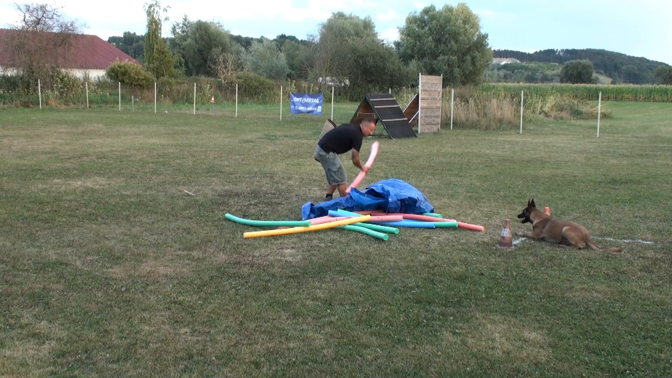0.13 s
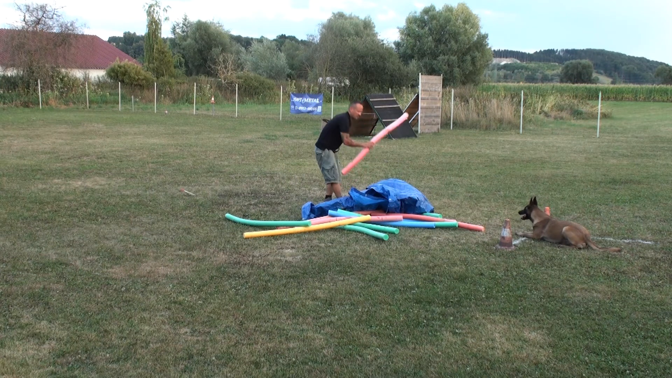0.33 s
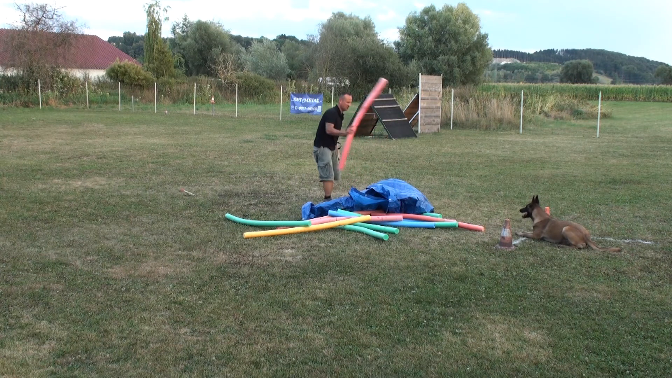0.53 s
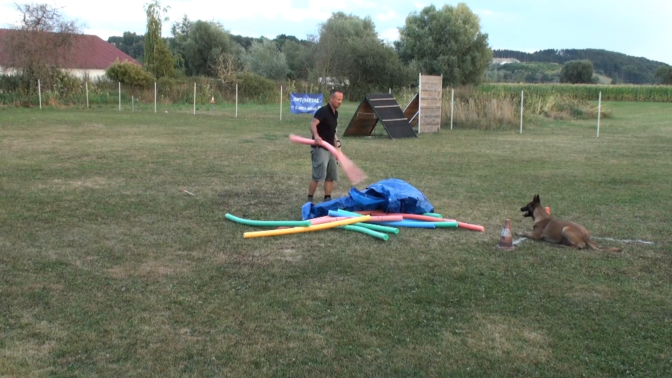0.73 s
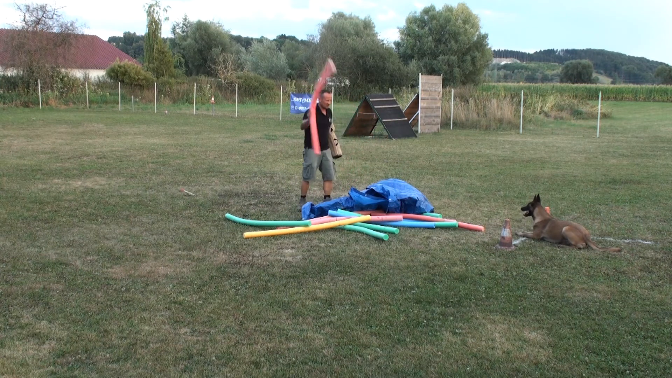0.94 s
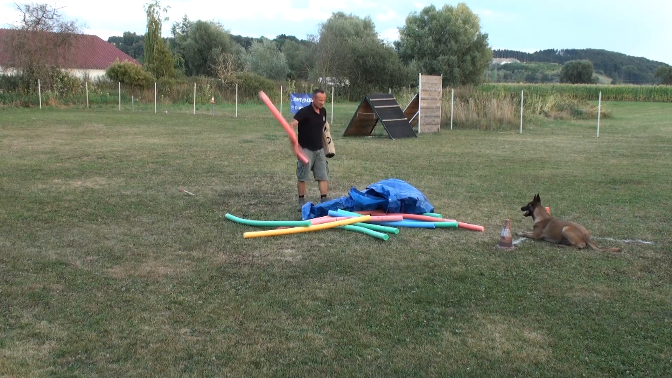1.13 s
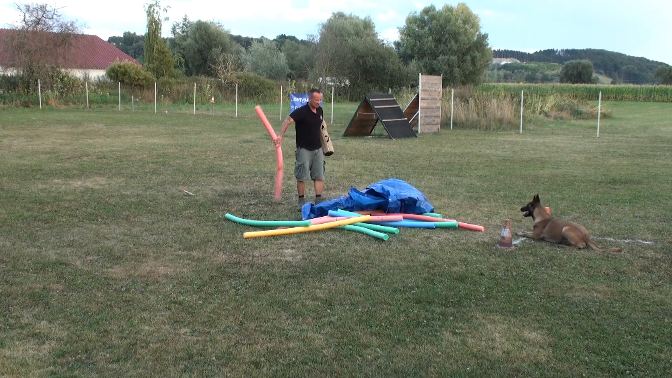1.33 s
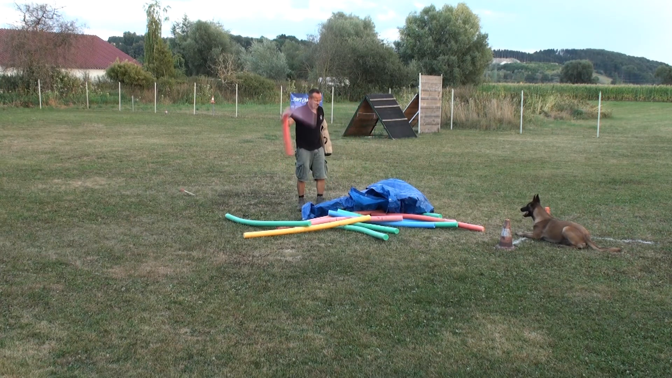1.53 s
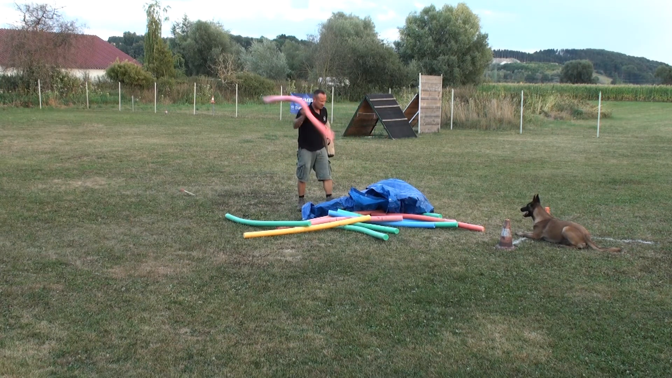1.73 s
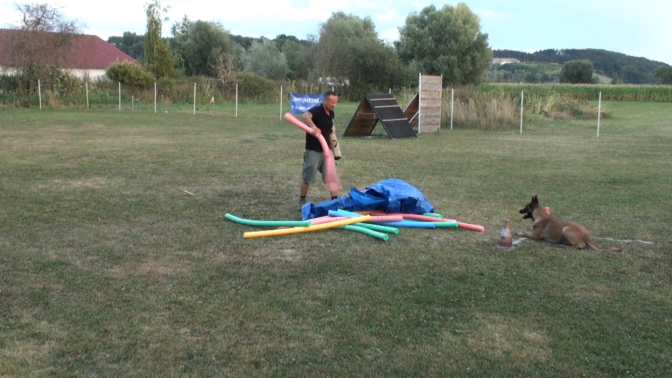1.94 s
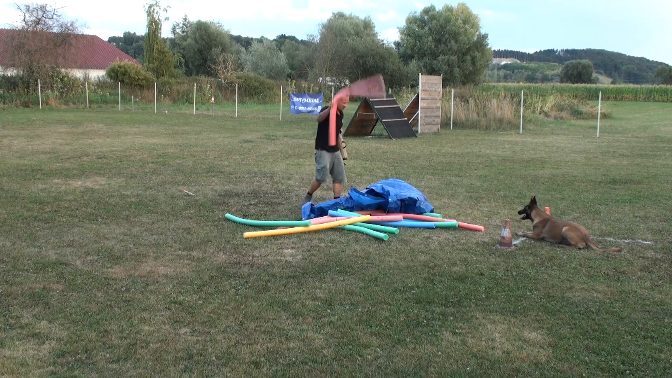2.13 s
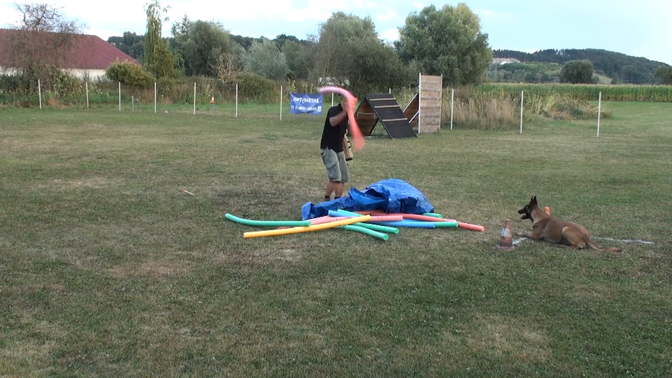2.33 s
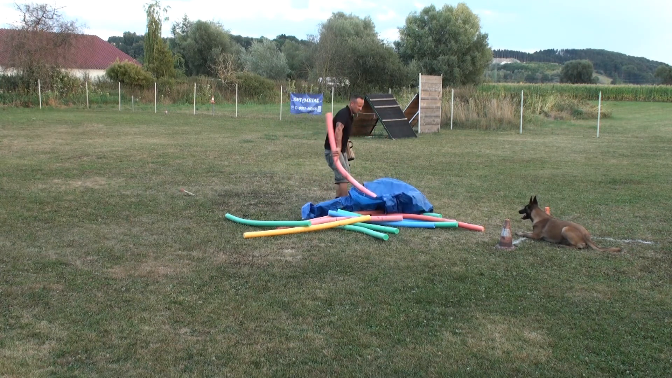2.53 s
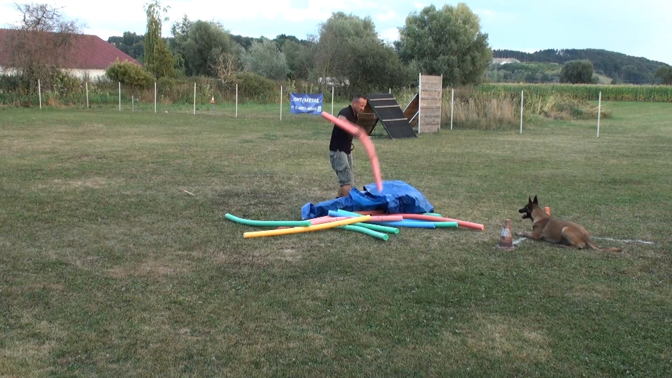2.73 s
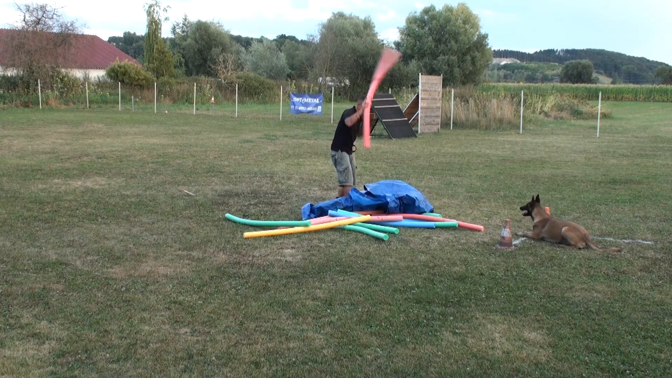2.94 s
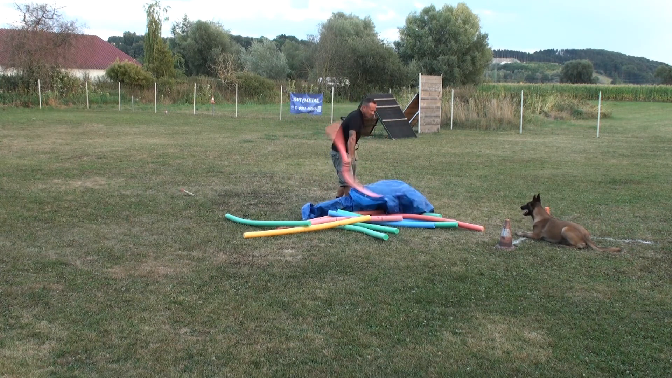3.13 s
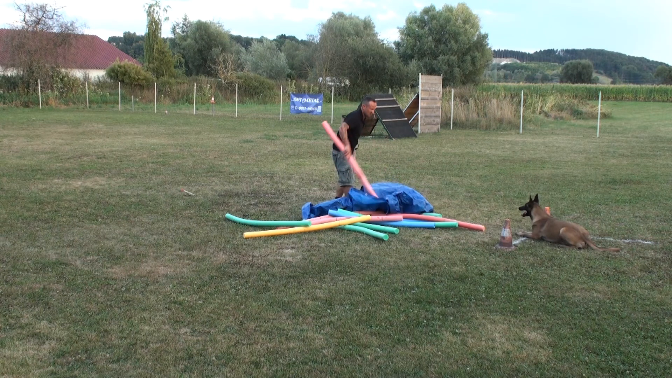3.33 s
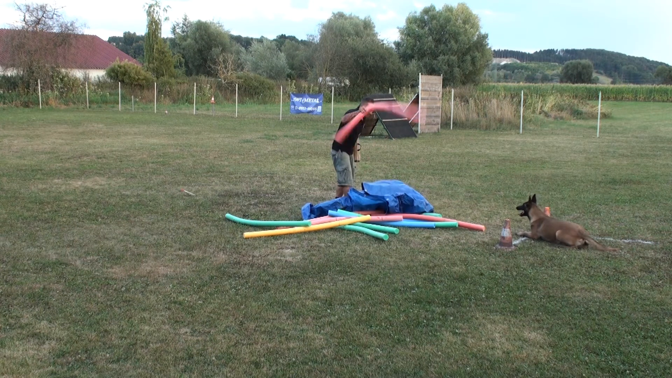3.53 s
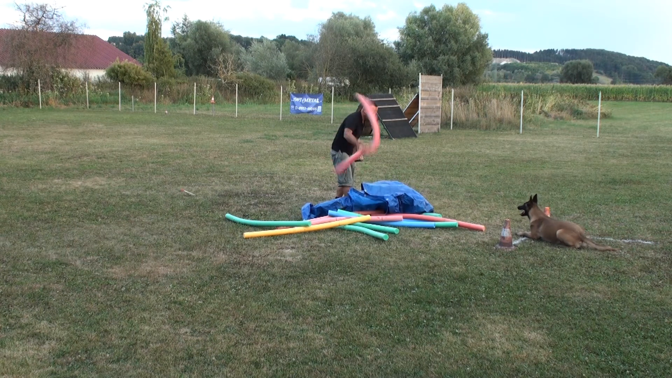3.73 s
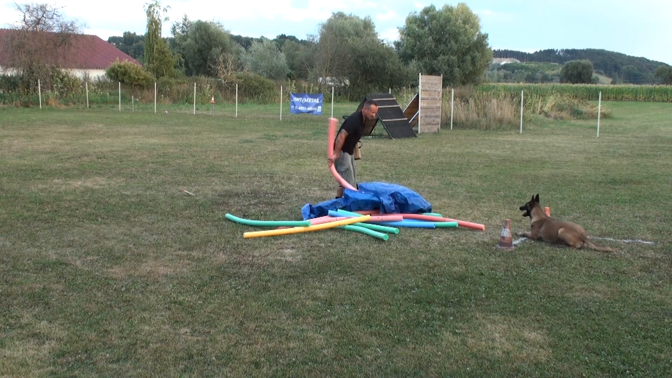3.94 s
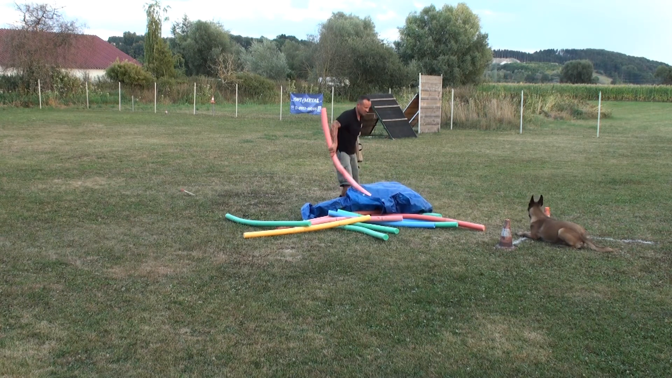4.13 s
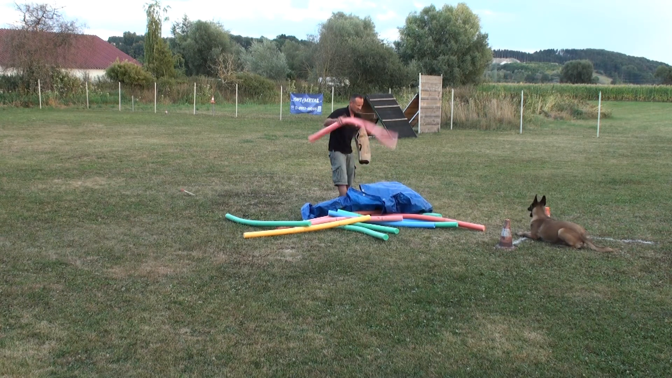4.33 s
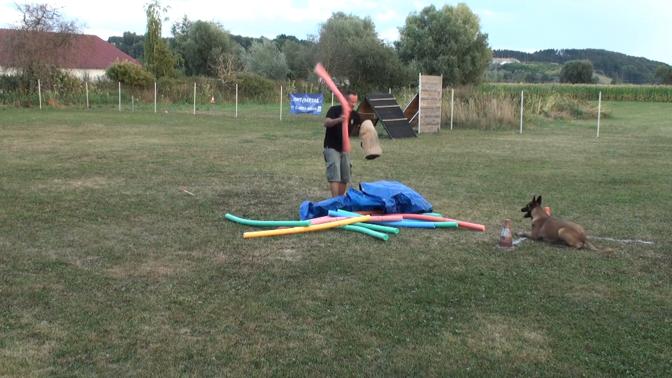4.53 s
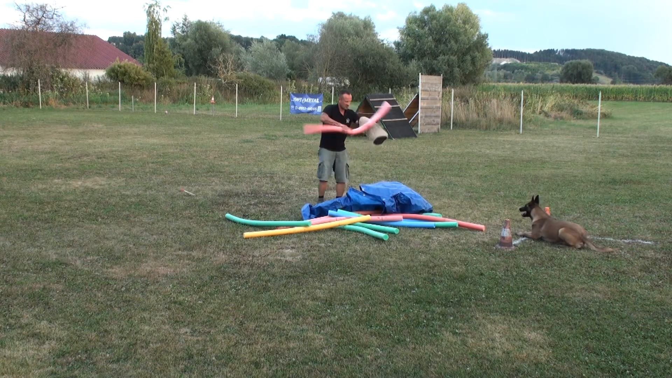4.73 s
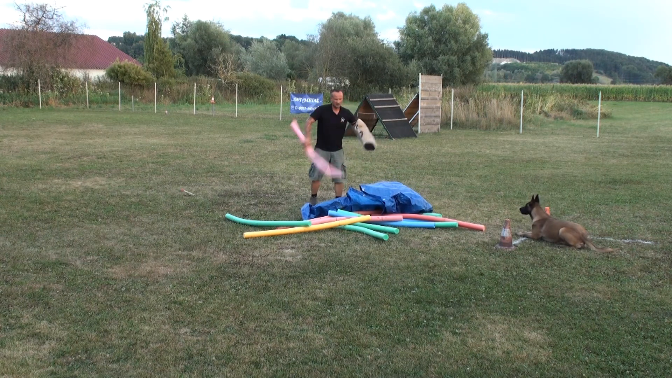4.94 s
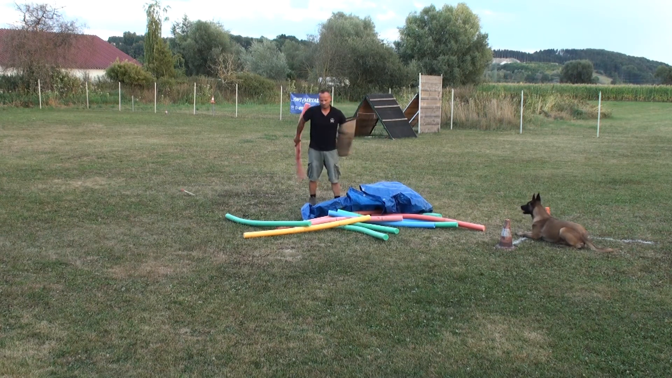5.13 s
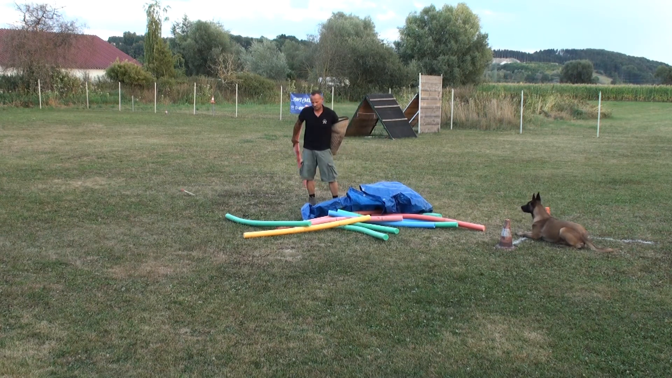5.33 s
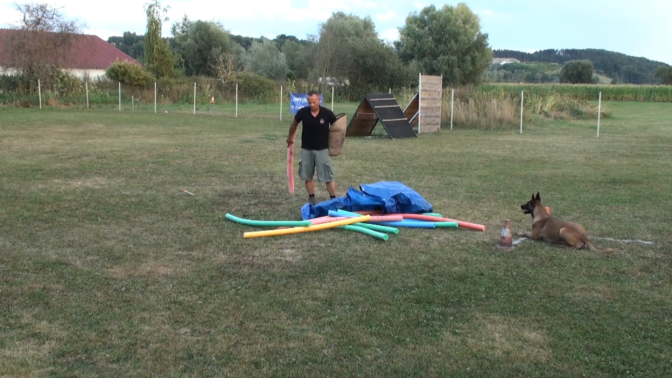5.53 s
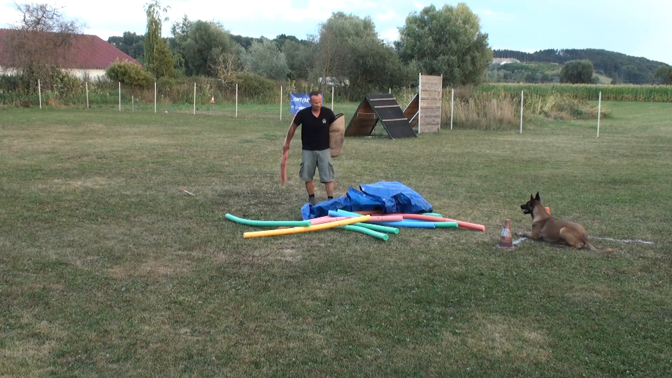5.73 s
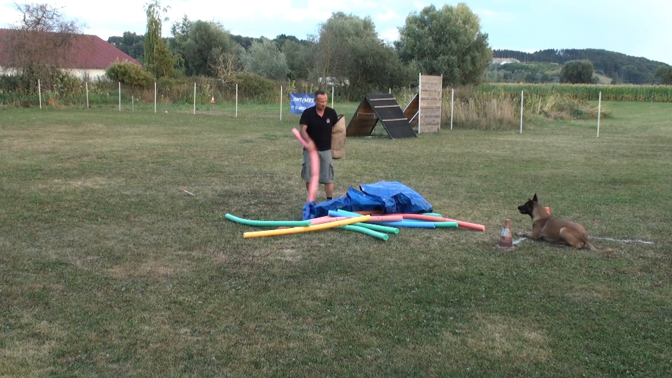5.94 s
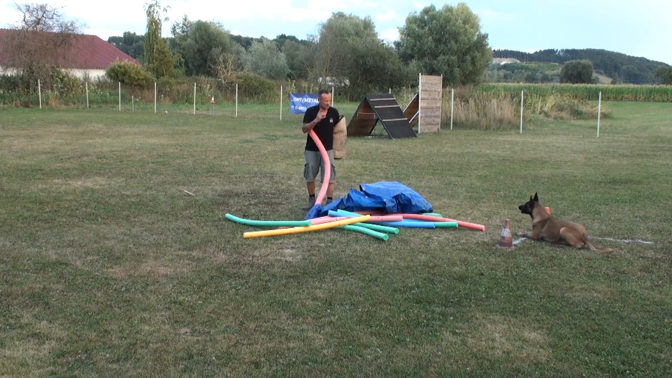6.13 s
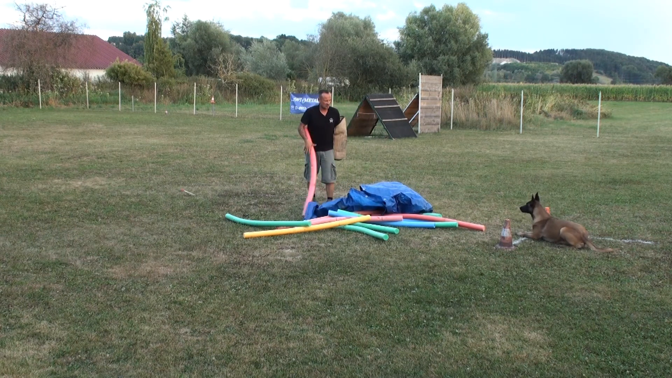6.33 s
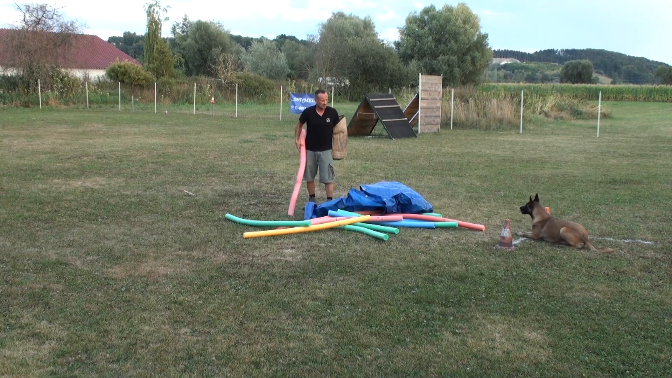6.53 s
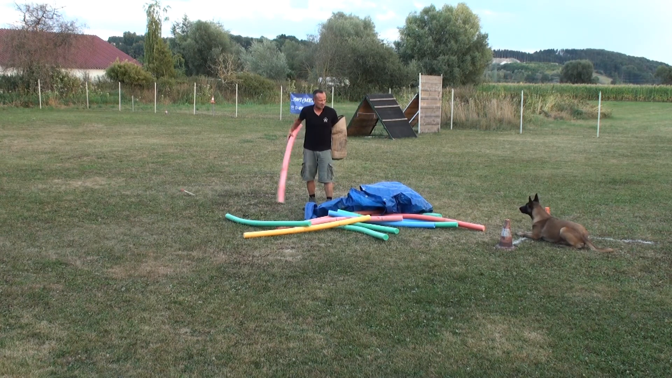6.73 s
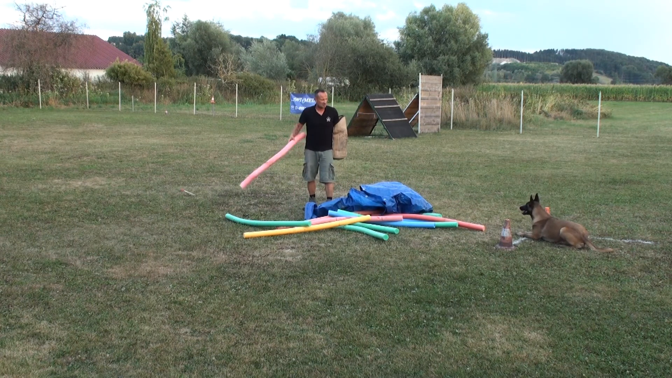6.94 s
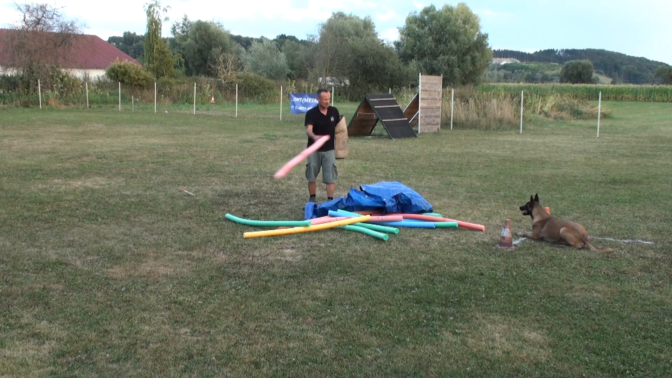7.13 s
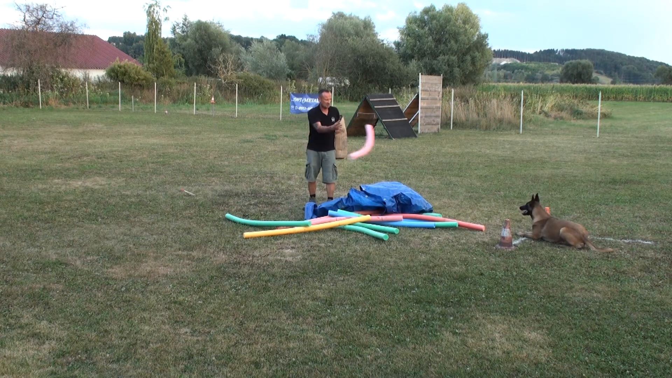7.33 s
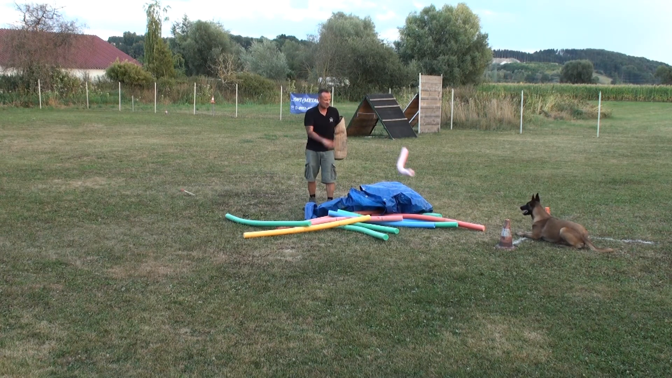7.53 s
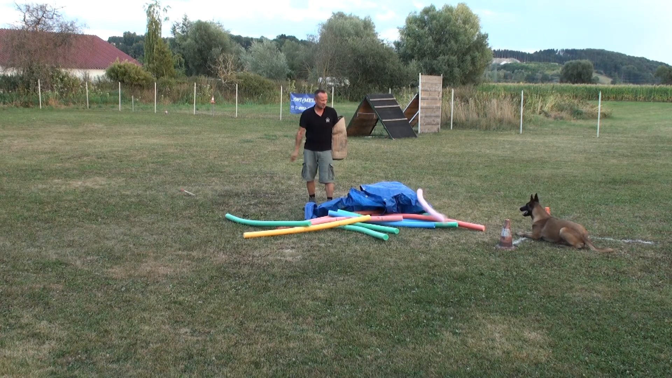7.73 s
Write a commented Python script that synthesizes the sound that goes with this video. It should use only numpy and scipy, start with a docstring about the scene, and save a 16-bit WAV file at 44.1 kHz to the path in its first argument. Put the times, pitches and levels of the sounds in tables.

```python
"""Open field: noise hush, a faint whine, and a distant engine (rumble, hum) that nears throughout.
From 0.8 s a hollow foam noodle ticks, swishes and bumps: crack bursts, brushed noise, falling pops.
A high bird calls from 1.7 s in short falling notes. At 2.6, 3.2 and 3.9 s the noodle smacks down hard:
dense cracks and a tube thump, tarpaulin crinkles, smeared returns off trees and buildings, diffuse scatter.
A lower bird calls from 2.9 s; more handling follows, and the hum comes up after 6.7 s."""
import sys
import numpy as np
from scipy import signal
from scipy.fft import rfft, irfft
from scipy.io import wavfile
from scipy.ndimage import uniform_filter1d

SR = 44100
rng = np.random.default_rng(int(sys.argv[2]) if len(sys.argv) > 2 else 0)


def pcm_store(signal):
    """Save signal as 16-bit PCM."""
    levels = np.round(np.clip(np.atleast_2d(signal), -1, 1) * 32767)
    wavfile.write(sys.argv[1], SR, levels.astype(np.int16).T)


N = 343539


def amp(db):
    """Decibels to gain."""
    return 10 ** (np.asarray(db) / 20)


def evened(x):
    """Scales to rms 1."""
    return x / np.sqrt(np.mean(x ** 2) + 1e-20)


def read(points, hz, axis=1):
    """Interpolates one table column along log frequency."""
    columns = np.transpose(points)
    return np.interp(np.log(hz + 1), np.log(columns[0] + 1), columns[axis])


def add(mix, s, sound):
    """Adds a sound to the mix at time s."""
    part = mix[max(round(s * SR), 0):][:len(sound)]
    part += sound[:len(part)]


def clock(size):
    """Time axis in seconds."""
    return np.arange(size) / SR


def colour(x, points, tilt_db_per_oct=0, bells=(), size=4096):
    """Causal filter of unit energy: spectrum, tilt, and bells (Hz, dB, sharpness)."""
    hz = abs(np.fft.fftfreq(size, 1 / SR))
    db = read(points, hz) + tilt_db_per_oct * np.log2(1 + hz / 500)
    for centre_hz, height_db, sharp in bells:
        db = db + height_db * np.exp(-(sharp * np.log((hz + 1) / centre_hz)) ** 2)
    response = np.exp(signal.hilbert(np.log(amp(db))).conj())  # minimum phase
    taps = np.fft.ifft(response).real[:size // 2]
    return signal.oaconvolve(x, taps / np.linalg.norm(taps))[:len(x)]


def grit(size, spread_db):
    """Noise whose samples differ in strength, like many tiny cracks."""
    strength = amp(spread_db * np.clip(rng.standard_normal(size), -2, 2))
    return evened(rng.standard_normal(size) * strength)


def burst(envelope, spread_db, size=70):
    """A run of tiny cracks under an envelope, energy spread evenly over frequency."""
    x = grit(len(envelope), spread_db)
    for _ in range(2):
        z = rfft(x * envelope)
        z /= np.sqrt(uniform_filter1d(abs(z) ** 2, size) + 1e-12)
        x = irfft(z, len(x)) * envelope / (envelope ** 2 + 1e-3)
    shaped = x * envelope
    return shaped * np.linalg.norm(envelope) / np.linalg.norm(shaped)


def drift(rate_hz):
    """Slow random wander of rms 1."""
    lowpass = np.exp(-(np.fft.rfftfreq(N, 1 / SR) / rate_hz) ** 2)
    return evened(irfft(rfft(rng.standard_normal(N)) * lowpass, N))


def wavering_tone(centre_hz, depth, rate_hz):
    """Sine whose frequency wanders by a fraction depth (rms)."""
    return np.sin(2 * np.pi * np.cumsum(centre_hz * (1 + depth * drift(rate_hz))) / SR)


# left-right likeness: (frequency [Hz], correlation [-1..1])
LIKENESS = [(60, 1), (290, 0.95), (640, 0.38), (1400, 0.12), (6800, 0.2), (10000, 0.3), (12500, 1)]


def pair(size):
    """Left and right noise, correlated by frequency band."""
    left, other = rfft(rng.standard_normal((2, size)))
    same = np.clip(read(LIKENESS, np.fft.rfftfreq(size, 1 / SR)), -1, 1)
    right = same * left + np.sqrt(1 - same ** 2) * other
    return irfft(np.array([left, right]), size)


# outdoor hush spectrum: (frequency [Hz], relative density [dB])
HUSH_SPECTRUM = [(15, -8), (40, -3), (90, 3.5), (280, 0.5), (450, -1.5), (1200, -1.5), (2200, -7),
                 (4500, -13), (9000, -18), (13000, -21.5), (16000, -26.5)]
HUSH_DB = -59


def hush():
    """Steady outdoor noise, alike left and right in the bass."""
    return np.array([colour(side, HUSH_SPECTRUM) for side in pair(N)]) * amp(HUSH_DB)


# engine rumble spectrum: (frequency [Hz], relative density [dB])
RUMBLE_SPECTRUM = [(60, -22), (130, -12), (195, 0), (225, -6.5), (280, 3), (360, -7.5), (480, -12),
                   (1000, -40.5)]
START_M, SPEED_M_PER_S = 197.4, 19.35
RUMBLE_START_DB, HUM_START_DB = -68.5, -71.5  # at START_M, hum unmuffled
FIRING_HZ = 127
MUFFLED_DB, CLEAR_FROM_S, CLEAR_TAKES_S = -11.5, 6.66, 0.72


def engine(throb_db=1.1):
    """Throbbing rumble and firing hum, gain inverse to distance; the hum is muffled, then clears."""
    t = clock(N)
    nearness = START_M / np.maximum(START_M - SPEED_M_PER_S * t, 10)
    rumble = np.array([colour(side, RUMBLE_SPECTRUM) for side in pair(N)])
    rumble = rumble * amp(RUMBLE_START_DB + throb_db * drift(rate_hz=8.8))
    muffled = 1 - np.clip((t - CLEAR_FROM_S) / CLEAR_TAKES_S, 0, 1)
    hum = amp(HUM_START_DB + MUFFLED_DB * muffled) * wavering_tone(FIRING_HZ, depth=0.0142, rate_hz=3.84)
    return nearness * (rumble + hum)


def whine(centre_hz=833, level_db=-76):
    """Faint tone of steady level and slightly wavering pitch."""
    return amp(level_db) * wavering_tone(centre_hz, depth=0.0035, rate_hz=16.0)


# crack spectrum of noodle and tarpaulin: (frequency [Hz], relative level [dB])
CRACK_SPECTRUM = [(40, -39), (100, -10.5), (165, 4), (250, -3), (340, 5), (480, -3), (850, 2), (1400, -0.5),
                  (2600, -3), (4500, -6), (7500, -12.5), (11300, -16), (16000, -49)]


def crack_colour(x, tilt_db_per_oct=0, bells=()):
    """Radiated spectrum shared by all cracks."""
    return colour(x, CRACK_SPECTRUM, tilt_db_per_oct, bells)


# ticks of tarpaulin and foam: (time [s], level [dB], tilt [dB/octave])
TICKS = [(0.775, -52.5, 6), (3.466, -50, 4), (3.493, -49, 3), (3.585, -52, 3), (4.14, -54, 7),
         (4.658, -46.5, 0.5), (4.923, -44.5, 7)]


def ticks(t60_s=0.018):
    """Short decaying crack bursts with a 5.5 kHz peak."""
    out, t = np.zeros(N), clock(8192)
    for s, db, tilt in TICKS:
        cracks = burst(amp(-60 * t / t60_s), spread_db=7.0)
        add(out, s, amp(db) * crack_colour(cracks, tilt, bells=[(5500, 4.0, 4)]))
    return out


# strokes of foam over cloth and grass: (peak time [s], level [dB], length [s], tilt [dB/octave])
SWISHES = [(1.247, -59.5, .028, 2), (1.323, -52.5, 0.034, 2.5), (4.758, -47, 0.019, 5),
           (4.799, -51.5, 0.022, 4.5), (6.024, -43.5, 0.038, -2.5), (6.084, -50, .033, -4),
           (6.179, -56.5, 0.072, -5), (6.335, -62, .14, -.5), (6.452, -54, 0.023, 1.5),
           (6.539, -60.5, .06, 0), (7.22, -57, 0.036, 1.5)]
# brushing spectrum: (frequency [Hz], relative level [dB])
BRUSH_SPECTRUM = [(150, -9), (600, 2), (1200, 1), (2500, 1.5), (5000, -1), (10500, -6.5), (13000, -17),
                  (16000, -41)]


def swishes(swell_share=.58):
    """Gritty friction noise under a lopsided Gaussian stroke."""
    out = np.zeros(N)
    for s, db, length_s, tilt in SWISHES:
        rise_s, fall_s = length_s * swell_share, length_s * (1 - swell_share)
        u = np.arange(-2 * rise_s, 2 * fall_s, 1 / SR)
        stroke = np.exp(-(u / np.where(u < 0, rise_s, fall_s)) ** 2)
        brushed = grit(len(u), spread_db=7.5) * stroke
        add(out, s + u[0], amp(db) * colour(brushed, BRUSH_SPECTRUM, tilt))
    return out


# noodle modes: (frequency [Hz], relative level [dB], t60 [s])
TUBE_MODES = [(95, -7.5, 0.136), (154, -8, 0.12), (245, 0.5, 0.15), (507, -1, 0.029), (722, -4, 0.06),
              (1060, -28, 0.071), (1426, -1, 0.045)]


def tube(t):
    """Air column and wall of the noodle: decaying modes after a blow."""
    return sum(amp(db - 60 * t / t60_s) * np.sin(2 * np.pi * hz * t) for hz, db, t60_s in TUBE_MODES)


# soft noodle bumps: (time [s], pop level [dB], mean pitch [Hz], pop length [s],
# ring level [dB], snap level [dB], snap resonance [Hz])
BUMPS = [(1.2232, -38.5, 1300, 0.0034, -48, -42, 3930), (1.333, -41, 1004, 0.0051, -70, -43.5, 2070),
         (4.7538, -25.5, 714, 0.004, -41.5, -33.5, 1150), (6.0069, -30, 546, 0.0035, -43, -26.5, 2080),
         (6.431, -44, 600, 0.0031, -54, -47, 2200), (7.785, -45.5, 1110, 0.0038, -60, -42.5, 2300)]


def bumps(snap_t60_s=0.022, sag=0.41):
    """Squeezed-air pop falling in pitch as the foam gives, tube ring and crack snap."""
    out, t = np.zeros(N), clock(8192)
    for s, pop_db, hz, length_s, ring_db, snap_db, snap_hz in BUMPS:
        u = np.minimum(t / length_s, 1)
        cycles = hz * length_s * (u + sag * u * (1 - u))
        pop = np.sqrt(abs(np.sin(np.pi * u))) * np.sin(2 * np.pi * cycles)
        cracks = burst(amp(-60 * t / snap_t60_s), spread_db=1)
        snap = crack_colour(cracks, tilt_db_per_oct=-1.6, bells=[(snap_hz, 6, 5)])
        add(out, s, -amp(pop_db) * pop + amp(ring_db) * tube(t) + amp(snap_db) * snap)
    return out


def clumps(shape, depth_db=2.5):
    """Random gain patches in frequency and time: scatter arrives in lumps."""
    patches = uniform_filter1d(rng.standard_normal(shape), size=9, axis=0)
    patches = uniform_filter1d(patches, size=6, axis=1)
    return evened(amp(depth_db * evened(patches)))


def scatter(x, table, onset_s, width, size=5):
    """Diffuse tail: each band's energy returns by countless paths, with its own decay."""
    hop = 64
    stft = dict(fs=SR, nperseg=256, noverlap=192)
    hz, _, z = signal.stft(x, **stft)
    t = np.arange(SR // hop) * hop / SR
    t60_s = read(table, hz, axis=2)[:, None]
    decay = amp(-60 * t / t60_s) ** 2
    paths = decay / decay.sum(1, keepdims=True) * (1 - np.exp(-(t / onset_s) ** 2)) ** 2
    energy = uniform_filter1d(abs(z) ** 2, size, axis=0)
    power = abs(signal.fftconvolve(energy, paths, axes=1))[:, :z.shape[1]]
    noise = signal.stft(rng.standard_normal((2, N)), **stft)[2]
    tail = noise / noise.std() * clumps(power.shape) * np.sqrt(power) * amp(read(table, hz))[:, None]
    mid, side = signal.istft(tail, **stft)[1][:, :N]
    return np.array([mid + width * side, mid - width * side])


# scatter off ground and nearby things: (frequency [Hz], relative level [dB], t60 [s])
NEAR_BANDS = [(100, -25, 0.079), (400, -8.5, 0.22), (1400, -5.5, 0.17), (3980, -5.5, 0.21),
              (11000, -7.5, 0.15)]


def near_scatter(x, onset_s, width, size=5):
    """Short diffuse tail from the ground and things nearby."""
    return scatter(x, NEAR_BANDS, onset_s, width, size)


# scatter off the whole field: (frequency [Hz], relative level [dB], t60 [s])
FIELD_BANDS = [(100, -16, 0.85), (500, -17, 0.98), (1750, -22, 1), (4000, -20.5, 1), (11000, -16, 0.43)]


def field_scatter(x, onset_s, width):
    """Slower, longer diffuse tail from the whole field."""
    return scatter(x, FIELD_BANDS, onset_s, width)


def bird(calls, notes, note_s=0.0392, step_s=0.037, fall=0.121, arch=0.067, rough=0.075):
    """Each call: two short hoarse notes that arch over and slide downwards."""
    out, u = np.zeros(N), np.linspace(0, 1, round(note_s * SR))
    swell = np.sin(np.pi * u)
    for s, db in calls:
        for k, (hz, note_db) in enumerate(notes):
            waver = evened(uniform_filter1d(rng.standard_normal(len(u)), size=24))
            pitch_hz = hz * (1 + fall * (.5 - u) + arch * (swell - np.pi / 4) + rough * waver)
            note = swell * np.sin(2 * np.pi * np.cumsum(pitch_hz) / SR)
            add(out, s + k * step_s, amp(db + note_db) * note)
    return out


# high bird calls: (time [s], level [dB])
HIGH_CALLS = [(1.65, -66), (4.18, -68), (4.322, -61.5), (4.665, -63.5), (5.2, -64.5), (5.52, -63),
              (6.578, -64), (7.479, -68)]
# notes of its call, in order: (pitch [Hz], level re call [dB])
HIGH_NOTES = [(3990, 1.5), (3310, 2.5)]


def high_bird():
    """Repeats a call whose second note is lower."""
    return bird(HIGH_CALLS, HIGH_NOTES)


def slap(db, contact_s, crack_db, thump_db, tilt, dip_hz, dip_db, air_hz, air_db, release_t60_s=0.085):
    """Contact zips along the noodle as dense cracks, then dies away over a hollow thump."""
    t = clock(8192)
    press = amp(-60 * np.maximum(t - contact_s, 0) / release_t60_s)
    first = 1 + (amp(crack_db) - 1) * np.exp(-t / 0.0021)
    # turf bounce cancels a low-middle band; air caught under the foam honks
    bells = [(dip_hz, -dip_db, 3), (air_hz, air_db, 8)]
    cracks = crack_colour(burst(press * first, spread_db=4.0, size=260), tilt, bells)
    return amp(db) * cracks + amp(thump_db) * tube(t)


# hard smacks: (time [s], level [dB], lay-down time [s], first crack [dB], thump level [dB],
# tilt [dB/octave], ground dip [Hz], dip depth [dB], trapped-air resonance [Hz], its height [dB],
# extra level thrown to far surfaces [dB])
SMACKS = [(2.5587, -21, 0.0021, 6.5, -35, 0.5, 560, 2, 1390, 4, 0),
          (3.2100, -22, 0.0074, 4.5, -37, 0.5, 630, 3.5, 1370, 2.5, 1),
          (3.8974, -20.5, 0.0094, -4, -35, -0.1, 370, 14, 1910, 5, -9)]


def smacks():
    """Direct smacks, and their stereo returns from far surfaces."""
    direct, returns = np.zeros(N), np.zeros((2, N))
    for s, *blow, thrown_db in SMACKS:
        sound = slap(*blow)
        add(direct, s, sound)
        throw_back(returns, s, sound, thrown_db)
    return direct, returns


def tarpaulin(db=-49, settle_s=0.091, per_s=400):
    """Crumpled sheet settles after each smack with ever rarer, fainter crinkles."""
    out, t = np.zeros(N), clock(20000)
    settling = np.exp(-t / settle_s)
    for s, *_ in SMACKS:
        strength = amp(2.4 * np.minimum(rng.exponential(1, len(t)), 3))
        sign = rng.choice([-1, 1], len(t))
        happens = rng.random(len(t)) < per_s / SR * np.sqrt(settling)
        crinkles = settling * strength * sign * happens
        add(out, s, amp(db) * np.sqrt(SR / per_s) * crack_colour(crinkles))
    return out


# trees and buildings: (delay [s], relative level [dB], smear [s])
REFLECTORS = [(.113, -22.5, 0.03), (.197, -29.5, 0.038), (.265, -28, .001), (.359, -31.5, .0015)]
# far echo spectrum: (frequency [Hz], relative level [dB])
ECHO_SPECTRUM = [(200, -1), (800, -5), (1750, 3.5), (2800, -5.5), (4200, -10), (7000, -17), (14000, -30)]


def throw_back(returns, s, sound, thrown_db):
    """Rough far surfaces keep the opening crack's outline but scramble its detail."""
    t = clock(6000)
    crack = sound[:len(t)] * np.exp(-t / 0.012)
    for delay_s, db, smear_s in REFLECTORS:
        spread = np.exp(-2 * t / smear_s)
        outline = np.sqrt(abs(signal.fftconvolve(crack ** 2, spread / spread.sum())))
        for side in returns:
            echo = colour(outline * rng.standard_normal(len(outline)), ECHO_SPECTRUM)
            add(side, s + delay_s, amp(db + thrown_db) * echo)


# lower bird calls: (time [s], level [dB])
LOW_CALLS = [(2.897, -62), (3.545, -58.5), (4.237, -58.5)]
# notes of its call, in order: (pitch [Hz], level re call [dB])
LOW_NOTES = [(2230, 1.5), (2760, -4.5)]


def low_bird():
    """Repeats a call whose second note is higher."""
    return bird(LOW_CALLS, LOW_NOTES)


def scene(bass_hz=65):
    """Noodle almost straight ahead; scatter and returns spread it to both sides."""
    background = hush() + engine() + whine()
    hits, returns = smacks()
    handling = ticks() + swishes() + bumps()
    # so thin a body radiates little deep bass
    highpass = signal.butter(2, bass_hz, "high", fs=SR, output="sos")
    noodle = signal.sosfilt(highpass, hits + handling + tarpaulin())
    direct = noodle * amp([[.2], [-.2]])  # dB left, right
    near = near_scatter(noodle, onset_s=0.0045, width=0.62)
    field = field_scatter(noodle, onset_s=0.021, width=0.31)
    echoes = 0.81 * returns + 0.46 * returns[::-1]
    calls = high_bird() + low_bird()
    far_birds = calls + amp(4) * near_scatter(calls, onset_s=0.01, width=0.98, size=1)
    return direct + near + field + echoes + far_birds + background


def record(dry, edge_hz=15900):
    """Linear-phase low-pass at edge_hz."""
    taps = signal.firwin(511, edge_hz, window=("kaiser", 9), fs=SR)
    return signal.oaconvolve(dry, taps[None], "same")


dry = scene()
out = record(dry)
pcm_store(out)
```